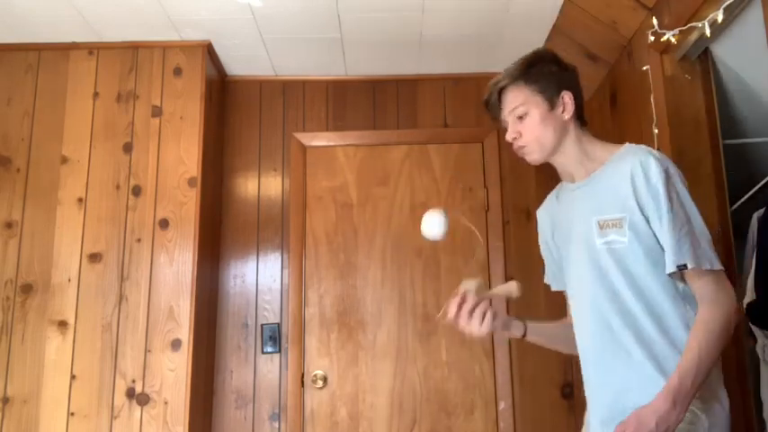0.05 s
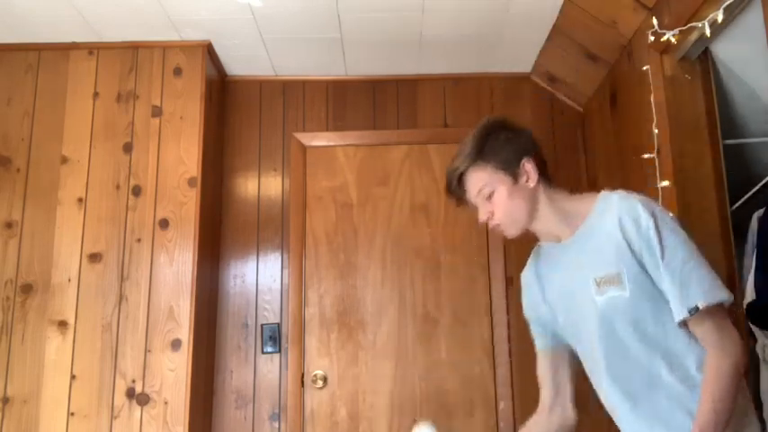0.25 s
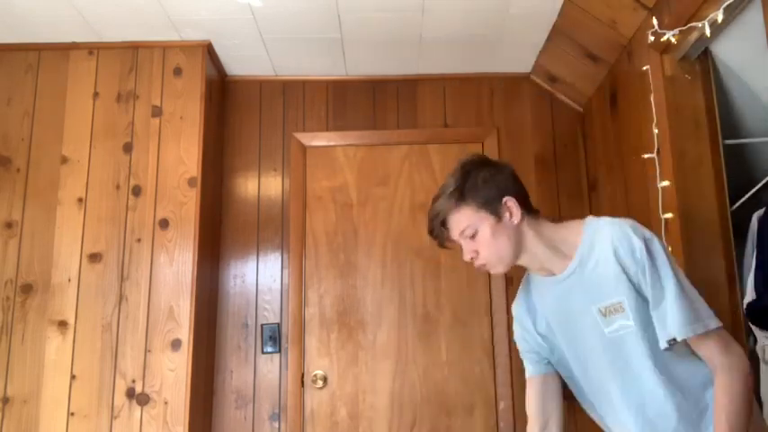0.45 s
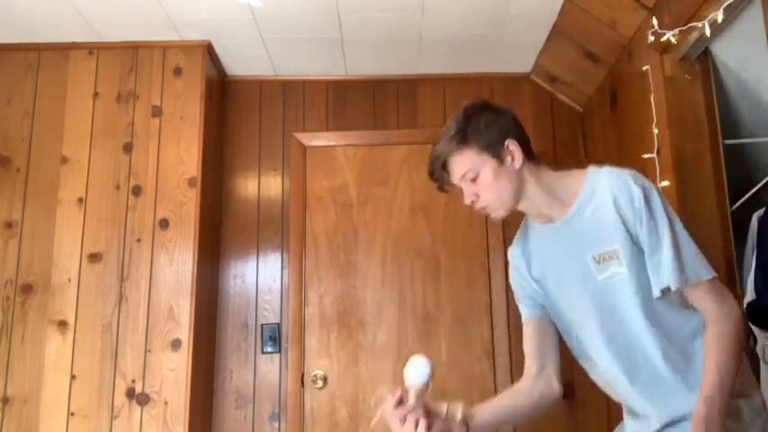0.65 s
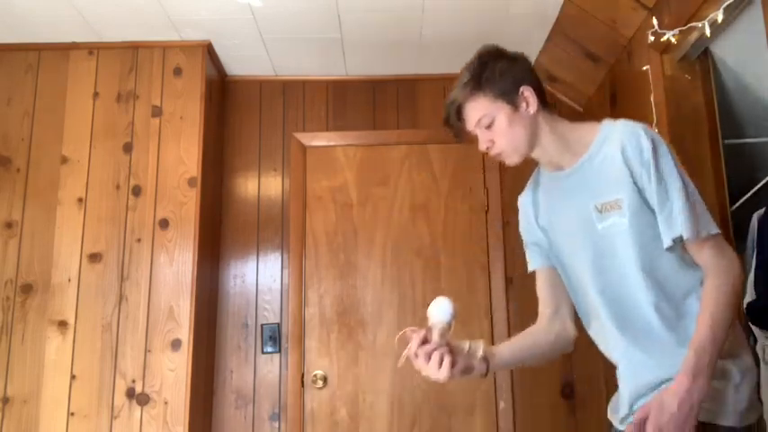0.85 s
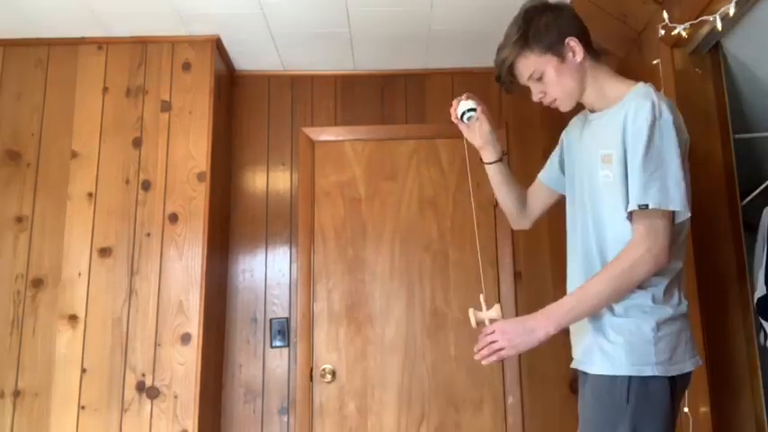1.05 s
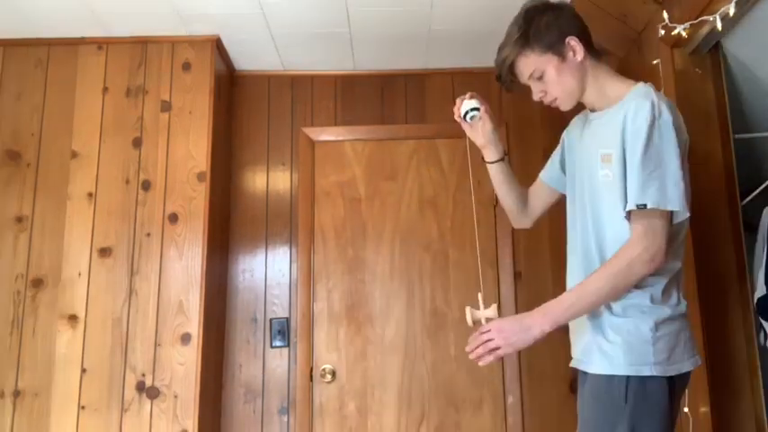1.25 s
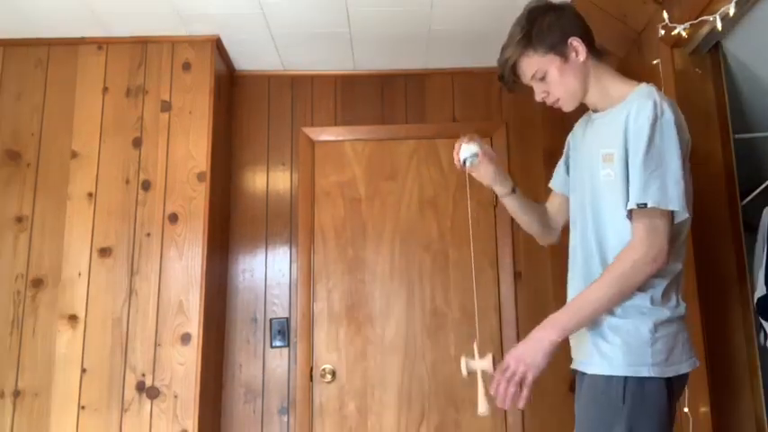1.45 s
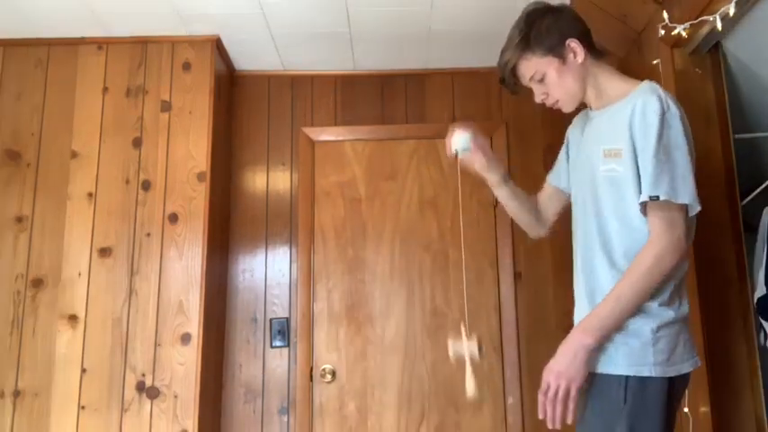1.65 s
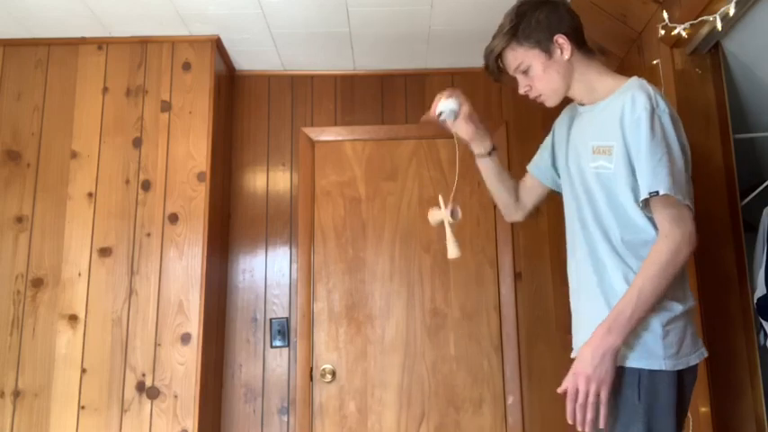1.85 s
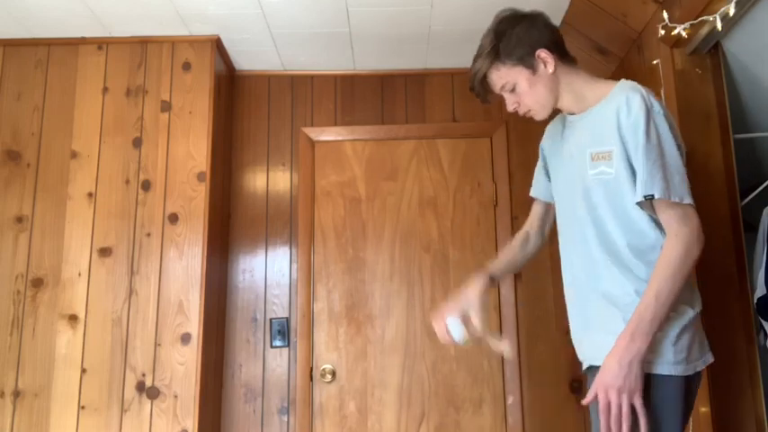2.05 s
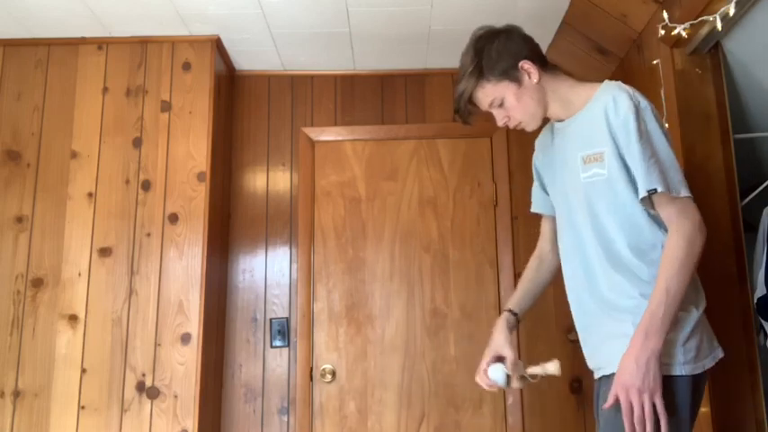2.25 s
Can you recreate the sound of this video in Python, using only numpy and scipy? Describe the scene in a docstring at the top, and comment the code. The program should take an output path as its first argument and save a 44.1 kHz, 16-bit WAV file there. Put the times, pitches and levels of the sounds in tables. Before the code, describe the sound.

Two short clacks come from a wooden cup-and-ball toy, first a hollow one, then a brighter one. Faint string rubbing and soft thuds surround them, over the low hum and hiss of a small room.

```python
"""A hollow wooden clack rings out in a small wood-panelled room: a kendama ball lands on its handle.
Later the swinging handle snaps against the ball with a brighter clack. Each hit is a click plus
briefly ringing wood, echoed by the walls. Around them come soft bumps and taps, a brushing sleeve
and the faint rub of the string, over a low hum and quiet background hiss that dip briefly once."""
import sys
import numpy as np
from scipy import signal
from scipy.fft import rfft, irfft, next_fast_len
from scipy.io import wavfile
from scipy.ndimage import map_coordinates

SR = 44100
rng = np.random.default_rng(int(sys.argv[2]) if len(sys.argv) > 2 else 0)


def pcm_store(signal):
    """Save signal as 16-bit PCM."""
    levels = np.round(np.clip(np.atleast_2d(signal), -1, 1) * 32767)
    wavfile.write(sys.argv[1], SR, levels.astype(np.int16).T)


N = 105840  # 2.4 s


def amp(db):
    """Turn decibels into a number to multiply by."""
    return 10 ** (np.asarray(db) / 20)


def unit(x):
    """Scale a sound to an average strength (rms) of 1."""
    return x / np.sqrt(np.mean(x ** 2) + 1e-20)


def unit_energy(x):
    """Scale each channel to a total energy of 1."""
    return x / np.sqrt(np.sum(x ** 2, axis=-1, keepdims=True) + 1e-20)


def along(points, hz):
    """Read between a table's rows on a log frequency scale."""
    freqs, values = np.transpose(points)
    return np.interp(np.log(hz + 1), np.log(freqs + 1), values)


def pan(db):
    """Left and right gains that make the left louder by db."""
    return amp(np.array([[db], [-db]]) / 2)


def fade(t, fade_s):
    """Die away by 60 dB every fade_s seconds."""
    return np.exp(-np.log(1000) * t / fade_s)


def wobble(rate):
    """A smooth curve through `rate` random points a second."""
    points = rng.standard_normal(int(N * rate / SR) + 4)
    return map_coordinates(points, [np.arange(N) * rate / SR])


def filtered(x, gain):
    """Turn each frequency up or down by gain(hz)."""
    size = x.shape[-1]
    padded = next_fast_len(size + SR // 2)
    hz = np.fft.rfftfreq(padded, 1 / SR)
    return irfft(rfft(x, padded) * gain(hz), padded)[..., :size]


def noise(gain, likeness, size=N):
    """Stereo noise shaped by gain(hz); likeness 1 makes both sides the same, -1 opposite."""
    def mid_side_gain(hz):
        angle = np.arccos(np.clip(along(likeness, hz), -1, 1)) / 2
        return gain(hz) * np.array([np.cos(angle), np.sin(angle)])
    mid, side = filtered(rng.standard_normal((2, size)), mid_side_gain)
    return unit(np.array([mid + side, mid - side]))


def low_hum(hum_hz=60, width_hz=25):
    """A wavering low note inside a narrow rumble, a little to the right."""
    level = amp(-62.5 + 3.7 * wobble(rate=10))
    phase = 2 * np.pi * hum_hz * np.arange(N) / SR + .5 * wobble(rate=12)
    hum = np.sqrt(2) * level * np.sin(phase)
    rumble = noise(lambda hz: 1 / (1 + ((hz - hum_hz) / width_hz) ** 2) ** 2, [(hum_hz, .93)])
    return pan(db=-4) * (hum + amp(-61.5) * rumble)


# tone of the quiet background hiss, with a gap cut near 8 kHz: f/Hz, relative level/dB
HISS_TONE = [(53, -34), (90, -3.5), (136, 3), (158, -7.5), (209, -7), (424, -13.5), (453, -23),
             (883, -22.5), (963, -19.5), (1360, -34), (6980, -40.5), (8120, -61.5), (9860, -40),
             (13900, -39), (15500, -56.5)]
# how alike the hiss is left and right: f/Hz, likeness
HISS_LIKENESS = [(60, 0.94), (180, 0.46), (550, 0.09), (1650, 0.28), (4970, -0.23), (15000, 0.15)]
def background_hiss(low_cut_hz=43):
    """A quiet rush whose low part slowly swells and sinks."""
    def gain(hz):
        return amp(along(HISS_TONE, np.maximum(hz, 100))) * hz ** 4 / (hz ** 4 + low_cut_hz ** 4)
    hiss = noise(gain, HISS_LIKENESS)
    lows = filtered(hiss, lambda hz: 1 / (1 + (hz / 450) ** 2))
    wander = amp(-4 * wobble(rate=2.7))
    return pan(db=0.1) * amp(-64.5) * (hiss + lows * (wander - 1))


# loudness of all but the clacks: t/s, level change/dB
DIP = [(.975, 0.5), (.997, -7), (1.011, -23), (1.025, -3), (1.059, -1)]
def dip():
    """The quiet sounds drop briefly, about a second in."""
    times, levels_db = np.transpose(DIP)
    return amp(np.interp(np.arange(N) / SR, times, levels_db))


# left-right likeness of echoes and soft touches, sides set opposite near 8.5 kHz: f/Hz, likeness
STEREO_LIKENESS = [(200, 0.68), (600, .7), (1200, 0.37), (3000, 0.2), (6500, 0.12), (8500, -1.3),
                   (10500, .5), (13000, .7)]
def soft_touches(touches, tone, rise_s):
    """Touches too soft to ring make swells of noise."""
    return swells(touches, rise_s) * noise(lambda hz: amp(along(tone, hz)), STEREO_LIKENESS)


def swells(touches, rise_s):
    """A level that rises and dies away at each touch."""
    level = np.zeros(N)
    for start_s, db, fade_s in touches:
        t = np.maximum(np.arange(N) / SR - start_s, 0)
        level += amp(db) * (1 - np.exp(-t / rise_s)) * fade(t, fade_s)
    return level


# the sleeve's stroke: t/s, level/dB, fade time/s
SLEEVE_STROKES = [(1.62, -70.5, 0.51)]
# its tone: f/Hz, relative level/dB
SLEEVE_TONE = [(400, -8.5), (1200, 5), (2600, -5.5), (4500, -8.5), (9000, -29)]
def sleeve():
    """A sleeve brushes as the arm lifts."""
    return soft_touches(SLEEVE_STROKES, SLEEVE_TONE, rise_s=.0238)


# the ball touching the hand: t/s, level/dB, fade time/s
TAPS = [(.926, -68, 0.049), (2.042, -58, .16)]
# its tone: f/Hz, relative level/dB
TAP_TONE = [(300, -6), (900, -2.5), (1250, 5), (1600, 1), (2200, -17), (5000, -46), (12000, -47)]
def ball_taps():
    """The ball settles in the hand with a faint, dull tap."""
    return soft_touches(TAPS, TAP_TONE, rise_s=.0047)


# the player's bumps: t/s, level/dB, fade time/s
BUMPS = [(.76, -63, 0.47), (.93, -43.5, 0.095), (1.255, -58.5, 0.19), (1.62, -53, 0.26), (1.78, -59.5, 0.5),
         (1.922, -40, 0.1)]
# their tone: f/Hz, relative level/dB
BUMP_TONE = [(30, -16.5), (70, -1), (220, 0.5), (450, -15.5), (800, -22), (1250, -26.5), (2000, -48.5),
             (5000, -64)]
def body_bumps():
    """Hands and feet make soft, low thuds."""
    return soft_touches(BUMPS, BUMP_TONE, rise_s=.008)


# the string's rubs: t/s, level/dB, fade time/s
RUBS = [(0, -61, .2), (.062, -72, .25), (.15, -71, .2)]
# tone of their hiss: f/Hz, relative level/dB
RUB_TONE = [(500, -16.5), (1500, -5.5), (3000, -5.5), (4200, -2), (5700, -8), (6600, 0), (8500, -11),
            (11000, -9.5), (14000, -3.5), (16000, -12.5)]
def string(start_hz=3450, fall_hz_per_s=2300, width_hz=260, rise_s=.0078):
    """String sliding over wood and skin hisses and whirrs, lower as it slows."""
    pitch = start_hz - fall_hz_per_s * np.arange(N) / SR
    flutter = noise(lambda hz: 1 / (1 + (hz / width_hz) ** 2), STEREO_LIKENESS)
    whirr = unit(flutter * np.sin(2 * np.pi * np.cumsum(pitch) / SR))
    hiss = soft_touches(RUBS, RUB_TONE, rise_s)
    return hiss + amp(-3.5) * swells(RUBS, rise_s) * whirr


# first echoes off nearby walls: left delay/s, right delay/s, relative level/dB
WALL_ECHOES = [(.0019, .0022, -9), (.0053, .005, -11), (.0075, .0072, -14), (.0134, .0137, -19),
               (.017, .0171, -16), (.0223, .0225, -18)]
# how long the room rings: f/Hz, fade time/s
ROOM_FADE = [(150, .32), (500, .17), (1400, .17), (3500, .2), (6500, .19), (13000, .17)]
def room_echo(size=22050, build_s=.0034):
    """The walls return a few clear echoes that blur into a short tail."""
    wash = noise(np.ones_like, STEREO_LIKENESS, size)
    hz, t, bands = signal.stft(wash, SR, nperseg=256)
    bands = bands * fade(t, along(ROOM_FADE, hz)[:, None])
    tail = signal.istft(bands, SR)[1][:, :size]
    build_up = 1 - np.exp(-np.arange(size) / SR / build_s)
    echo = amp(2) * unit_energy(tail * build_up)
    for left_s, right_s, db in WALL_ECHOES:
        echo[[0, 1], [round(left_s * SR), round(right_s * SR)]] += amp(db - 1.5)
    return echo


def click(tone, size):
    """The moment of contact: the shortest pulse with the given tone."""
    hz = np.fft.rfftfreq(size, 1 / SR)
    cepstrum = irfft(np.log(amp(along(tone, hz))))
    # folding onto the first half packs the energy at the start
    cepstrum[1:size // 2] *= 2
    cepstrum[size // 2 + 1:] = 0
    return unit_energy(irfft(np.exp(rfft(cepstrum))))


def clack(notes, click_tone, direct_tone, start_s, click_db, pan_db, size=4096):
    """Wood hits wood: a click and fast-fading notes, heard directly and off the walls."""
    t = np.arange(size) / SR
    wood = amp(click_db) * click(click_tone, size)
    for hz, db, fade_s in notes:
        wood += amp(db) * unit_energy(np.sin(2 * np.pi * hz * t) * fade(t, fade_s))
    low_cut = signal.butter(2, 490, "high", fs=SR, output="sos")  # small things give off little bass
    wood = signal.sosfilt(low_cut, wood)
    wood = np.pad(wood, (round(start_s * SR), N))[:N]
    direct = pan(pan_db) * filtered(wood, lambda hz: amp(along(direct_tone, hz)))
    echoes = signal.fftconvolve(wood[None], room_echo(), axes=1)[:, :N]
    return direct + echoes


# notes the landing rings with: f/Hz, relative level/dB, fade time/s
LANDING_NOTES = [(527, -19, 0.01), (956, -17.5, 0.025), (1024, -7, 0.092), (1229, -4.5, 0.06),
                 (1475, -11, 0.11), (1620, -8, 0.048), (1970, -7.5, .05), (2120, -16.5, 0.055),
                 (2600, -18.5, 0.041), (3040, -17.5, 0.053), (3900, -19.5, 0.029), (6416, -18, 0.0051),
                 (12470, -25.5, 0.0047)]
# tone of its click: f/Hz, relative level/dB
LANDING_CLICK = [(100, -27), (300, -22), (750, -16), (1100, 3), (1800, 2.5), (2500, -3.5), (3800, -11),
                 (5000, -22.5), (6600, -21), (8500, -27), (10500, -17), (13000, -22.5), (15500, -36)]
# how much goes straight to the listener: f/Hz, level change/dB
LANDING_DIRECT = [(300, -2.5), (1050, 3.5), (1600, 3), (2200, -2), (6000, -4.5), (13000, 0)]
def ball_landing():
    """The ball lands on the handle with a hollow clack."""
    return amp(.5) * clack(LANDING_NOTES, LANDING_CLICK, LANDING_DIRECT,
                           start_s=.2494, click_db=.5, pan_db=-1)


# notes the snap rings with: f/Hz, relative level/dB, fade time/s
SNAP_NOTES = [(360, -31.5, 0.043), (592, -16, 0.044), (800, -14, 0.063), (944, -5, .04),
              (1113, -10.5, 0.019), (1453, -11.5, 0.03), (2417, -19, 0.081), (3800, -12.5, .015),
              (4903, -10.5, 0.019), (5106, -11, 0.07), (5540, -9, 0.097), (6006, -11, 0.098),
              (6438, -12.5, 0.045)]
# tone of its click: f/Hz, relative level/dB
SNAP_CLICK = [(100, -1), (300, -33), (650, 2), (1100, 16.5), (2000, 3.5), (3000, -1.5), (5000, 3),
              (6400, 8), (7800, -36), (10500, -29.5), (14000, -15), (16000, -42.5)]
# how much goes straight to the listener: f/Hz, level change/dB
SNAP_DIRECT = [(300, -17), (950, 0), (1550, -17), (3000, -10), (5500, -0.5), (9000, -8), (13000, -5.5)]
def handle_snap():
    """The swinging handle hits the ball with a brighter clack, on the left."""
    return amp(-2) * clack(SNAP_NOTES, SNAP_CLICK, SNAP_DIRECT, start_s=1.9234, click_db=-.5, pan_db=8)


def scene():
    """Two clacks over the small sounds of play, hum and hiss."""
    clacks = ball_landing() + handle_snap()
    handling = string() + body_bumps() + ball_taps() + sleeve()
    background = low_hum() + background_hiss()
    return (background + handling) * dip() + clacks


def record(dry):
    """Cut away the very highest treble."""
    return filtered(dry, lambda hz: hz < 15600)


dry = scene()
out = record(dry)
pcm_store(out)
```